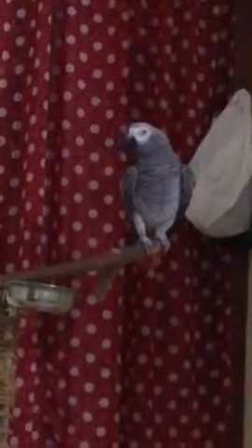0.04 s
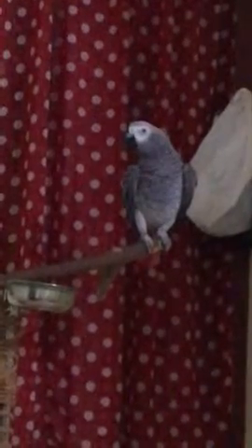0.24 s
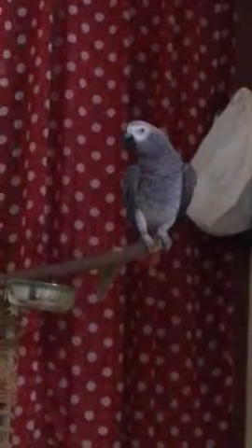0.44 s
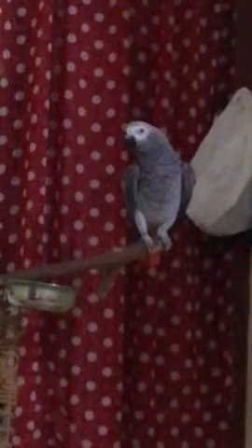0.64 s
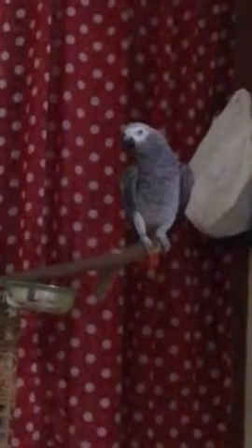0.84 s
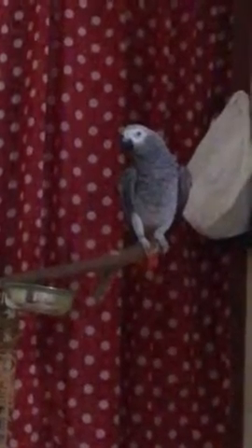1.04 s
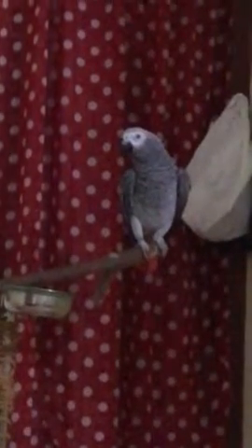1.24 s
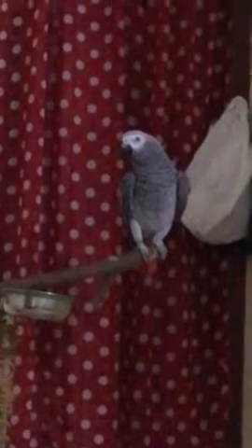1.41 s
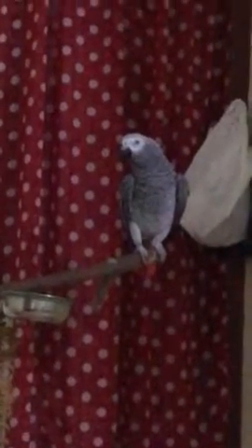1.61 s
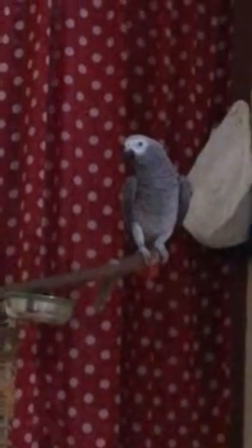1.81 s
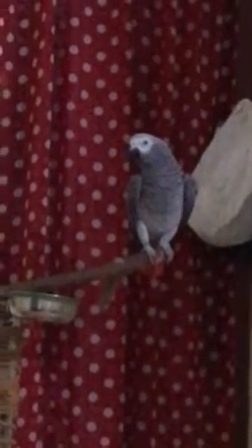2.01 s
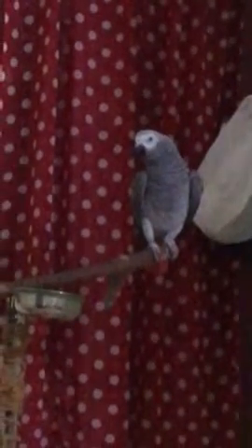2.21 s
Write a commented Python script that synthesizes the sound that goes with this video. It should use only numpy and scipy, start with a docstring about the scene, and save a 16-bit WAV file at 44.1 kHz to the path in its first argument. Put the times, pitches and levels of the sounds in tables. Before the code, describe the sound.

A parrot gives one loud, high whistle-squawk from about 0.2 to 0.5 seconds, sliding down in pitch and turning hoarse and raspy at the end. Its echo fades in the room by about 1.2 seconds. A faint low rumble and thin whine lie underneath, with a barely audible clock-like tick once a second and very soft rustles between about 1 and 2 seconds.

```python
"""In a bare, echoing room, a grey parrot gives one loud, falling whistle-squawk.
Overtones swell and fade around the whistle, and a hoarse throat resonance sinks below it
as the beak moves. Air and rasp fray the voice as it ends, and the room rings on.
Behind it are a low rumble, a thin high whine, a far clock-like tick once a second and soft rustles."""
import sys
import numpy as np
from scipy import signal
from scipy.fft import rfft, irfft
from scipy.io import wavfile
from scipy.ndimage import map_coordinates

SR = 44100
rng = np.random.default_rng(int(sys.argv[2]) if len(sys.argv) > 2 else 0)


def digitize_waveform(pressure):
    """Quantize a signal to 16-bit integers and store it at the path in sys.argv[1].

    Rows of a 2-D input are taken as channels; values are limited to [-1, 1].
    """
    field = np.atleast_2d(pressure).T
    bounded = np.clip(field, -1, 1)
    quanta = np.round(bounded * 32767).astype(np.int16)
    wavfile.write(sys.argv[1], SR, quanta)


N = 103635

# tone colour of the room's rumble and hiss: f/Hz, level/dB
RUMBLE_COLOUR = [(15, -61.5), (25, -30.5), (52, -4.5), (71, 1.5), (143, -11.5), (311, -12.5), (485, -21.5),
                 (1110, -23), (1920, -25), (2700, -30), (3320, -28.5), (4530, -31), (5030, -31.5),
                 (11300, -34), (12500, -38), (16200, -65.5), (22000, -120)]
# loudness of the thin whine: t/s, level/dB
WHINE_LEVEL = [(0, -87), (.15, -82.5), (.95, -80), (1.22, -80.5), (1.32, -88), (1.6, -100), (1.71, -80.5),
               (2.13, -82), (2.22, -94), (2.35, -95)]
# the voice's base pitch, an octave below the whistle: t/s, f/Hz
CALL_PITCH = [(.195, 1990), (.205, 1813), (.216, 1796), (.25, 1753), (.3, 1662), (.36, 1556), (.4, 1476),
              (.445, 1374), (.478, 1259), (.505, 1315)]
# how hard the bird pushes: t/s, level/dB
CALL_EFFORT = [(.194, -23), (.215, -14), (.24, -4), (.27, -8), (.3, -0.5), (.345, -0.5), (.378, 6.5),
               (.41, -9.5), (.445, 4.5), (.48, -13), (.5, -1)]
# how rough the voice is: t/s, roughness/0-1
CALL_ROUGHNESS = [(.195, 0.87), (.225, 0.33), (.275, 0.31), (.295, 0.6), (.36, 0.1), (.42, 0.1),
                  (.49, 0.46)]
# tones around the whistle: multiple of the base pitch, loudest at t/s, level/dB, swell/s, fade/s
CALL_OVERTONES = [(1, 0.28, -58.5, .09, 0.12), (3, 0.28, -36, .048, 0.091), (4, 0.31, -32, 0.05, 0.061),
                  (5, .33, -53, 0.062, .045), (6, .365, -46.5, 0.062, .04), (7, .36, -64.5, .12, 0.037),
                  (8, 0.3723, -49.5, 0.031, .035)]
# resonances of the throat, blown by air: f/Hz, width/Hz, level/dB
THROAT_RESONANCES = [(2846, 380, -7.5), (4400, 230, 2), (6600, 750, -3), (9000, 1200, -17.5),
                     (12000, 1500, -25)]
# tone colour of the rasp: f/Hz, level/dB
RASP_COLOUR = [(500, -57), (900, -30), (1200, -2.5), (1600, -4.5), (2050, 1.5), (3200, -1), (3900, -11.5),
               (4800, -1), (5600, -3), (7500, -4), (8600, -2.5), (11000, -5), (12500, -5)]
# the sinking, hoarse resonance: t/s, f/Hz, level/dB, share of noise/0-1
HOARSE_PATH = [(.195, 2080, -51, 1), (.22, 1830, -47, 0.8), (.25, 1643, -45.5, 1), (.29, 1611, -44.5, .9),
               (.35, 1560, -61, 0), (.42, 1509, -52.5, 0.5), (.48, 1480, -60, 0.1)]
# dips in the voice's tone colour: f/Hz, width/Hz, level/dB
VOICE_DIPS = [(2352, 57, -7.5), (3860, 200, -18), (5993, 100, -7.5), (7445, 660, -5.5)]
# the room's first reflections: delay/s, level/dB
ROOM_ECHOES = [(.0043, -11), (0.0129, -5)]
# how long the room rings: f/Hz, time to fade by 60 dB/s
ROOM_RING = [(500, .9), (1500, 0.89), (3000, 0.75), (5000, 0.66), (6500, .62), (9000, .52), (12500, .42)]
# far ticks: t/s, level/dB
FAR_TICKS = [(.245, -66), (1.243, -62.5), (2.246, -61.5)]
# broad tone colour of a tick: f/Hz, level/dB
TICK_BODY = [(240, -38.5), (400, 0.5), (442, -6.5), (850, -3), (967, -10), (1110, -1.5), (1780, -11.5),
             (2240, -4.5), (3020, -10.5), (3380, -9), (12000, -25), (15600, -52), (22000, -120)]
# resonances of a tick: f/Hz, width/Hz, level/dB
TICK_RESONANCES = [(1170, 200, -7), (2110, 430, -10), (3420, 310, -15), (6000, 1500, -13.5)]
# soft rustles: middle t/s, length/s, body level/dB, hiss level/dB
SOFT_RUSTLES = [(0.984, 0.15, -100, -76.5), (1.422, 0.18, -70, -74.5), (1.736, 0.054, -75.5, -80.5),
                (1.878, 0.17, -69.5, -76.5)]

FREQS = np.arange(N // 2 + 1) * SR / N  # every frequency in the spectrum, in Hz
CALL_START, CALL_END = CALL_EFFORT[0][0], CALL_EFFORT[-1][0]
WOBBLE_HZ, JITTER_HZ = 29, 300  # how fast the voice wavers and how fast it trembles


def undb(db):
    """Turn decibels into a gain to multiply by."""
    return 10 ** (np.asarray(db) / 20)


def curve(rows, at):
    """Join a table's points with straight lines and read off values."""
    return np.interp(at, *np.array(rows, float).T)


def colour(rows):
    """Gain at each frequency from (f/Hz, level/dB) points, falling away below the first."""
    hz, db = np.array(rows, float).T
    return undb(np.interp(np.log(FREQS + 1), np.log(hz), db)) * np.minimum(FREQS / hz[0], 1) ** 2


def resonance(hz, width_hz):
    """A steep-sided peak that favours frequencies near hz."""
    return 1 / (1 + ((FREQS - hz) / (width_hz * .5)) ** 2 / 2) ** 2


def resonances(rows):
    """Several peaks added together, each at its own level."""
    return sum(undb(db) * resonance(hz, width) for hz, width, db in rows)


def noise(gain):
    """Noise shaped by a gain at each frequency, then scaled to an average power of 1."""
    shaped = irfft(rfft(rng.standard_normal(N)) * gain, N)
    return shaped / np.sqrt(np.mean(shaped ** 2))


def flutter(rate_hz):
    """Random wavering of typical size 1, up to about the given rate."""
    return noise(1 / (1 + (FREQS / rate_hz) ** 4))


def background(t):
    """The room's rumble and hiss, with two narrow bands of noise: a low hum and a thin whine."""
    hum = undb(-77.5) * noise(resonance(hz=72.5, width_hz=13))
    whine = undb(curve(WHINE_LEVEL, t)) * noise(resonance(hz=4570, width_hz=330))
    rumble = undb(-67.5) * noise(colour(RUMBLE_COLOUR))
    return rumble + hum + whine


def parrot(t):
    """A falling, unsteady whistle that follows the bird's effort, roughened by its breath."""
    effort = undb(curve(CALL_EFFORT, t))
    rough = curve(CALL_ROUGHNESS, t)
    waver = 1 + .0028 * flutter(WOBBLE_HZ) + .014 * rough * flutter(JITTER_HZ)
    phase = 2 * np.pi * np.cumsum(curve(CALL_PITCH, t) * waver) / SR
    whistle = undb(-30) * effort * np.sin(2 * phase)
    tone = np.sqrt(2) * (whistle + overtones(t, phase))
    tone *= 1 + .4 * rough * flutter(JITTER_HZ)  # the loudness trembles too
    attack = np.clip((t - CALL_START) / .001, 0, 1)
    release = np.exp(-np.maximum(t - CALL_END, 0) / .006)
    return beak(attack * release * (tone + breath(t, phase, effort * rough) + hoarse(t)))


def overtones(t, phase):
    """Multiples of the base pitch that each swell, flicker and fade; higher ones enter later."""
    tones = 0
    for multiple, peak_s, db, swell_s, fade_s in CALL_OVERTONES:
        from_peak = (t - peak_s) / np.where(t < peak_s, swell_s, fade_s)
        level = undb(db - 6.5 * from_peak ** 2)
        entry = np.clip((t - CALL_START) / (multiple * .0045), 0, 1) ** 3
        flicker = 1 + .3 * flutter(WOBBLE_HZ)
        tones += entry * flicker * level * np.sin(multiple * phase)
    return tones


def breath(t, phase, strength):
    """A puff opens the call; air in the throat and a growing rasp pulse with the voice."""
    pulses = strength * (1 + .5 * np.cos(phase))
    air = undb(-47) * noise(resonances(THROAT_RESONANCES))
    progress = np.clip((t - CALL_START) / (CALL_END - CALL_START), 0, 1)
    rasp = undb(-40.5) * progress ** 2 * noise(colour(RASP_COLOUR))
    puff_level = undb(-58) * np.exp(-abs(t - CALL_START) / .12)
    puff = puff_level * noise(resonance(hz=4170, width_hz=1300))
    return pulses * (air + rasp) + puff


def hoarse(t):
    """A low throat resonance sinks as the beak moves, narrowing from noise to a thin tone."""
    times, hz, db, noise_share = np.array(HOARSE_PATH).T
    phase = 2 * np.pi * np.cumsum(np.interp(t, times, hz)) / SR
    noisy = np.interp(t, times, noise_share)
    narrow_noise = flutter(rate_hz=93) * np.sin(phase) + flutter(rate_hz=93) * np.cos(phase)
    broad_noise = undb(-7) * noise(resonance(hz=1874.6, width_hz=330))
    thin_tone = np.sqrt(2 * (1 - noisy ** 2)) * np.sin(phase)
    return undb(np.interp(t, times, db)) * (noisy * narrow_noise + broad_noise + thin_tone)


def beak(voice, low_cut_hz=1080):
    """The tone colour leaving the beak: a few dips, and no bass because the throat is small."""
    dips = undb(sum(db * resonance(hz, width) for hz, width, db in VOICE_DIPS))
    bass_cut = signal.butter(6, low_cut_hz, "high", fs=SR, output="sos")
    return signal.sosfilt(bass_cut, irfft(rfft(voice) * dips, N))


def room(voice, t, band_hz=500):
    """The direct sound, two near reflections and a dense tail of echoes whose treble dies first."""
    age = np.maximum(t - .006, 0)  # the tail starts after a short gap
    build_up = 1 - np.exp(-age / .004)
    scatter = rfft(rng.standard_normal(N))
    tail = 0
    for hz in np.arange(0, 14001, band_hz):
        share = np.maximum(1 - abs(FREQS - hz) / band_hz, 0)
        fade = undb(-60 * age / curve(ROOM_RING, hz))
        band = irfft(scatter * share, N) * fade * build_up
        tail += band * np.sqrt(np.mean(share ** 2) / np.sum(band ** 2))  # same energy, long or short
    echoes = sum(undb(db) * map_coordinates(voice, [(t - delay) * SR]) for delay, db in ROOM_ECHOES)
    return voice + echoes + undb(.5) * signal.fftconvolve(voice, tail)[:N]


def ticks(t, rise_s=.018, hold_s=.035, ring_s=.67):
    """Far ticks, blurred by the room into short, faintly ringing washes of noise."""
    level = 0
    for start, db in FAR_TICKS:
        rise = np.clip((t - start) / rise_s, 0, 1)
        level += rise * undb(db - 60 * np.maximum(t - start - hold_s, 0) / ring_s)
    return level * noise(undb(5) * colour(TICK_BODY) + resonances(TICK_RESONANCES))


def rustles(t):
    """Soft swells of noise with a dull body and a fine hiss."""
    body = noise(resonance(hz=1047, width_hz=2630))
    hiss = noise(resonance(hz=7404, width_hz=10000))
    sound = 0
    for middle, length, body_db, hiss_db in SOFT_RUSTLES:
        swell = np.exp(-2 * ((t - middle) / length) ** 2)
        sound += swell * (undb(body_db) * body + undb(hiss_db) * hiss)
    return sound


def scene():
    """The parrot in its room, over the quiet sounds behind it, in one channel."""
    t = np.arange(N) / SR
    return (room(parrot(t), t) + ticks(t) + rustles(t) + background(t))[None]


def record(dry, top_hz=12650):
    """Cut away the highest treble steeply."""
    return signal.sosfilt(signal.ellip(12, .2, 80, top_hz, fs=SR, output="sos"), dry)


dry = scene()
out = record(dry)
digitize_waveform(out)
```